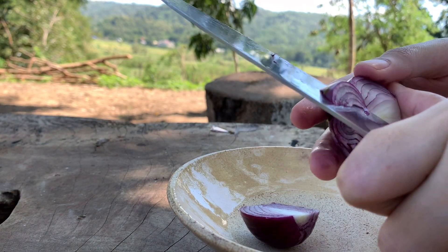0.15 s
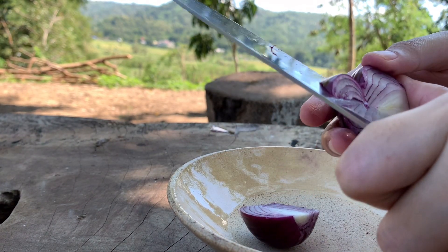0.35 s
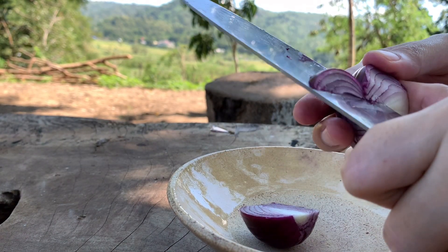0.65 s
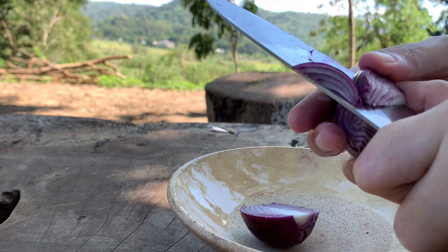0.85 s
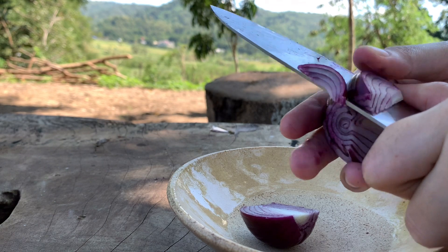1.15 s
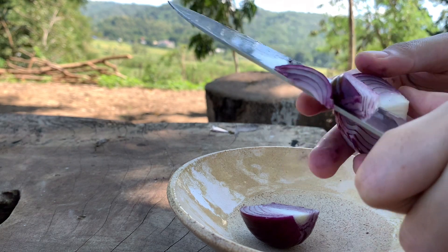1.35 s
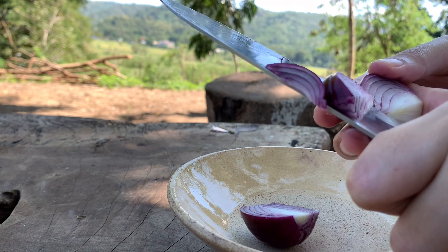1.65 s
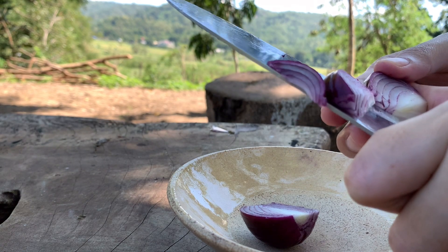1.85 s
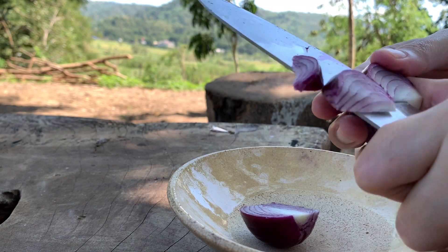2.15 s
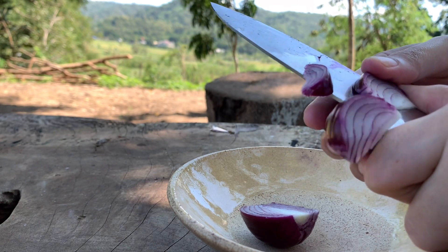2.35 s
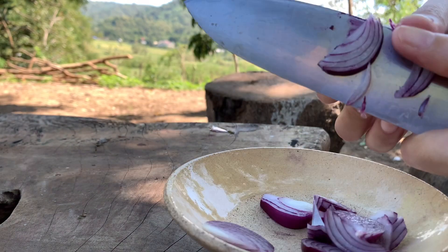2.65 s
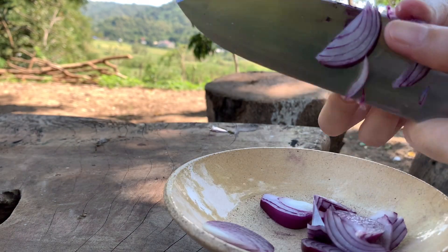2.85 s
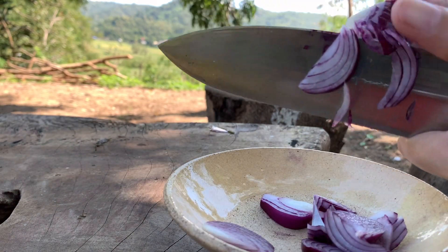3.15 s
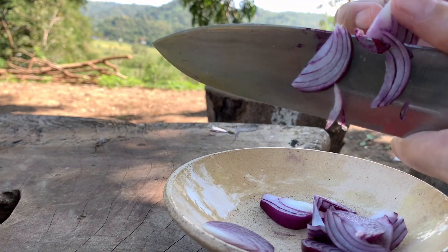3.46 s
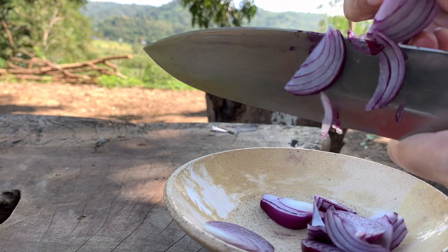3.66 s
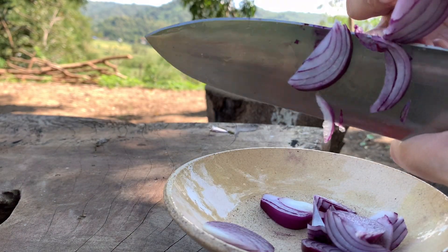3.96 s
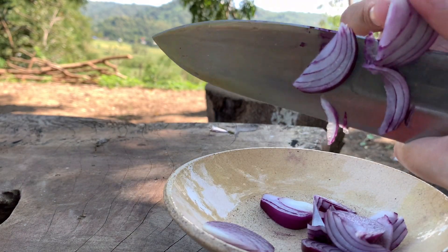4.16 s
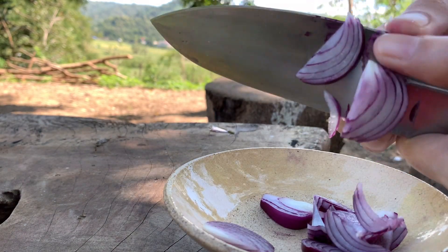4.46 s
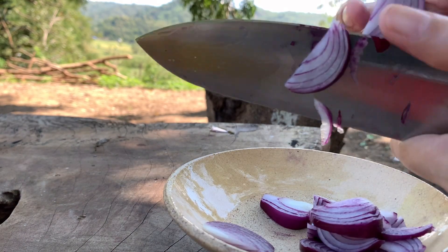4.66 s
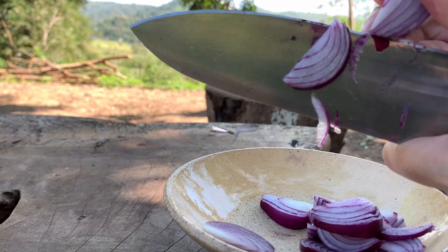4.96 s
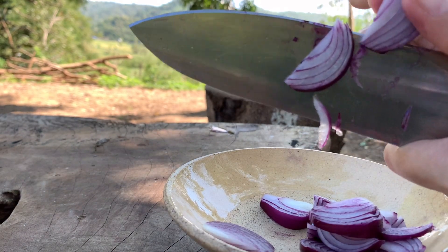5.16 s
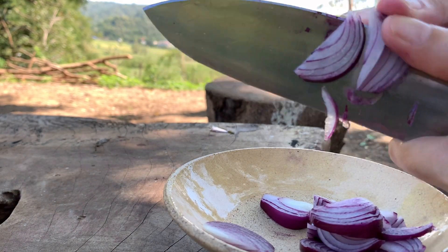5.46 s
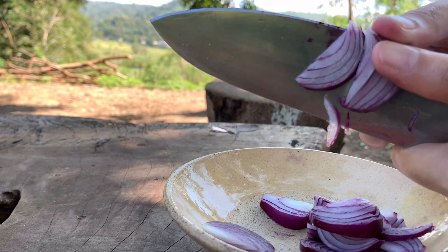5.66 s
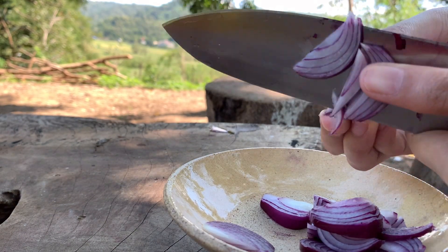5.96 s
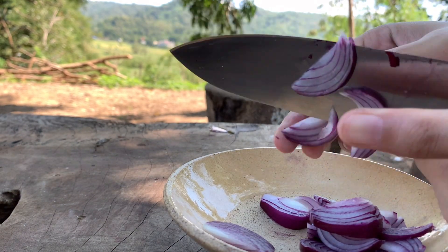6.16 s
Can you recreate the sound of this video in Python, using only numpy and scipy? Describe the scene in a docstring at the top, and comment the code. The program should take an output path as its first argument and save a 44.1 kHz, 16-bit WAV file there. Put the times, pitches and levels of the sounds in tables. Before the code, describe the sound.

Close to the microphone, a knife rasps and crunches through an onion held in the hand, and cut pieces drop with short, dull knocks on a plate. Behind it a distant rooster crows, then a nearer one, then a louder, nearer third, and the far one starts again at the end. Open countryside, with low unsteady rumble, light wind on the microphone and faint hush.

```python
"""At an outdoor table in the country, an onion is sliced in the hand, close by, over a plate.
The blade rasps and crunches through the layers as bursts of cell clicks and wet noise, and pieces
knock on the plate, whose modes ring briefly. Three roosters crow in turn, each nearer than the last,
and the farthest starts again: a buzz of overtones through a throat, with scattered echoes.
Filtered noise makes the low rumble, the breeze on the microphone and the hush under it all."""
import sys
import numpy as np
from scipy import signal
from scipy.fft import rfft, irfft, next_fast_len
from scipy.io import wavfile
from scipy.ndimage import uniform_filter1d

SR = 44100
rng = np.random.default_rng(int(sys.argv[2]) if len(sys.argv) > 2 else 0)


def unload_wav(signal):
    """Save mono or channel-first audio to the path in sys.argv[1] as 16-bit WAV at rate SR, clipped to [-1, 1]."""
    wavfile.write(
        sys.argv[1],
        SR,
        np.round(np.clip(np.atleast_2d(signal).T, -1, 1) * 32767).astype(np.int16),
    )


N = 278006
TIME = np.arange(N) / SR
CUTOFF_HZ = 15900   # top of the finished sound, and of the overtones of a crow


def from_db(db):
    """Decibels to gain."""
    return 10 ** (np.asarray(db) / 20)


def rms_one(x):
    """Scale to unit power."""
    return x / np.sqrt(np.mean(x ** 2) + 1e-20)


def level_at(rows, t=TIME):
    """Read a level curve at the times t."""
    moments, level_db = np.transpose(rows)
    return np.interp(t, moments, level_db)


def at_hz(points, hz):
    """Read a spectrum on a log-frequency axis."""
    f, value = np.transpose(points)
    return np.interp(np.log(hz + 0.0026), np.log(f), value)   # the offset avoids log(0)


def shaped(x, gain_at):
    """Filter by a gain that is a function of frequency."""
    length = x.shape[-1]
    size = next_fast_len(length + 2048)
    hz = np.arange(size // 2 + 1) * SR / size
    return irfft(rfft(x, size) * gain_at(hz), size)[..., :length]


def drift(rate_hz, size=N):
    """Random wander of spread one, fading out above rate_hz."""
    return rms_one(shaped(rng.standard_normal(size), lambda f: 1 / (1 + (f / rate_hz) ** 2)))


def evened(x, span_s):
    """Hold the running level at one."""
    return x / np.sqrt(np.abs(uniform_filter1d(x ** 2, int(span_s * SR))) + 1e-12)


def resonance(x, hz, width_hz):
    """Two-pole resonance with unit gain on top."""
    r = np.exp(-np.pi * width_hz / SR)
    zeros = np.array([1, 0, -1]) * (1 - r * r) / 2
    poles = [1, -2 * r * np.cos(2 * np.pi * hz / SR), r * r]
    return signal.lfilter(zeros, poles, x + 1e-18)


def panned(x, pan_db):
    """Left louder than right by pan_db."""
    return x * from_db(np.array([[.5], [-.5]]) * pan_db)


def bump(t, s, half):
    """A bell of height one around the moment s."""
    return np.exp(-.5 * ((t - s) / half) ** 2)


def held(start, length, attack, release):
    """The samples of an event, its progress from -.5 to .5, and its attack-hold-release envelope."""
    on = (TIME >= start) & (TIME < start + length)
    age = TIME[on] - start
    envelope = np.clip(np.minimum(age / attack, (length - age) / release), 0, 1)
    return on, age / length - .5, envelope


def rumble():
    """A low hum: noise through two equal narrow resonances, its level unsteady."""
    # slow level curve: (time [s], level [dB])
    rumble_levels = [(0, -45), (.45, -53.5), (.9, -44.5), (1.7, -46), (2.2, -51), (3.2, -50.5),
                     (4.2, -45.5), (4.8, -45), (5.7, -51.5), (6.3, -43)]
    hum = rng.standard_normal(N)
    for _ in range(2):
        hum = resonance(hum, hz=61.9, width_hz=18.8)
    throb_db = 0.75 * drift(rate_hz=13)
    return from_db(level_at(rumble_levels) + throb_db) * evened(hum, span_s=0.15)


def breeze():
    """A light breeze on the microphone: low noise that swells in gusts."""
    # gusts added to the steady breeze: (time of the middle [s], half length [s], level [dB])
    gusts = [(3.0, 0.14, -59), (4.052, 0.5, -56), (4.817, 0.11, -51.5)]
    colour = [(8, -1), (25, -30), (44, 20.5), (70, -15), (200, -38.5)]   # (frequency [Hz], level [dB])
    eddies = rms_one(shaped(rng.standard_normal(N), lambda f: from_db(at_hz(colour, f))))
    strength = from_db(-64.5) + sum(from_db(db) * bump(TIME, s, half) for s, half, db in gusts)
    return strength * eddies


def country_air():
    """The hush of open country: stereo noise whose left-right likeness depends on frequency."""
    # relative spectrum of the hush: (frequency [Hz], level [dB])
    air_spectrum = [(47, -38), (80, -5), (98, -6), (125, -9), (160, -16.5), (289, -17), (331, -24.5),
                    (615, -25.5), (937, -36.5), (1120, -32.5), (1560, -37.5), (1700, -40), (2040, -45),
                    (16000, -58.5)]
    # likeness of the two channels: (frequency [Hz], correlation [0-1])
    air_likeness = [(60, 0.41), (140, 1), (250, 0.42), (500, 0.68), (1000, 0), (16000, 0)]
    mid, side = rng.standard_normal((2, N))
    mid = shaped(mid, lambda f: from_db(at_hz(air_spectrum, f)) * np.sqrt(1 + np.clip(at_hz(air_likeness, f), -1, 1)))
    side = shaped(side, lambda f: from_db(at_hz(air_spectrum, f)) * np.sqrt(1 - np.clip(at_hz(air_likeness, f), -1, 1)))
    return from_db(-55) * rms_one(np.array([mid + side, mid - side]))


def background():
    """Rumble and breeze a little to the right, in the wide hush."""
    return panned(rumble() + breeze(), pan_db=-1.6) + country_air()


def outdoors(x, wet_db, t60, far_db, lag_ms, pan_db, dull_hz=3000):
    """Ground and sheds scatter a short dull tail; the trees add a fainter, longer one."""
    t = TIME[:SR]
    fading = from_db(-60 * t / t60) + from_db(far_db - 60 * t / 1.55)
    sparse = rng.random((2, SR)) < .05
    scatter = rng.standard_normal((2, SR)) * sparse * fading * (t > .004)
    scatter /= np.sqrt(np.sum(scatter ** 2, axis=1, keepdims=True))
    echoes = signal.fftconvolve(x[None], scatter, axes=1)[:, :N]
    tail = shaped(echoes, lambda f: 1 / np.hypot(1, f / dull_hz))
    delay_s = lag_ms / 1000 * np.array([[0], [1]])   # right behind left
    direct = shaped(x, lambda f: np.exp(-2j * np.pi * f * delay_s))
    return panned(direct + from_db(wet_db) * tail, pan_db) / np.hypot(1, from_db(wet_db))


def crow(notes, throat, scoop, jitter, flutter, shake_hz, hiss, waver_db=4.5):
    """The syrinx buzzes through the throat; slack at a note's ends, it runs flat, rough and breathy."""
    # moments when the beak works during a note and the balance of the bands shifts: (time of the # middle [s],
    # half length [s], first resonance [dB], second resonance [dB], overtones [dB])
    balance_shifts = [(0.741, 0.02, 5, 10.5, 4), (1.331, 0.021, -9, -9.5, 7),
                      (1.865, 0.034, -2.5, -14, 13.5), (1.976, 0.033, 3, 7.5, -2), (2.14, 0.019, -2, 5, 10),
                      (3.6, 0.019, 4.5, -9, 0.5), (3.742, 0.018, -12, 4.5, 1.5), (3.791, 0.011, 9, -5, -6),
                      (5.097, .03, -19, -4.5, 8.5), (5.54, 0.026, -21, -6, 19.5),
                      (5.638, 0.0089, 3, -22, 7), (5.685, .03, 3.5, 10, -4)]
    out = np.zeros(N)
    for (start, length, hz, glide, arch, scoop_s, drop_s, db, swell_db,
         bright_db, brighten_db, shrill_db, held_rough) in notes:
        on, progress, envelope = held(start, length, attack=0.33 * scoop_s, release=.02)
        t = TIME[on]
        scooping = np.clip(1 - (t - start) / scoop_s, 0, 1)
        dropping = np.clip(1 - (start + length - t) / drop_s, 0, 1)
        slack = np.maximum(scooping, dropping)
        pitch = (hz + glide * progress - arch * (2 * progress) ** 2) * (1 - scoop * slack ** 2)
        slack_rough = np.maximum(0.781 * scooping * (2 - scooping), 0.71 * dropping)
        rough = np.clip(slack_rough, held_rough, 1)

        # slackness lifts the lowest band and dulls the overtones
        shift_first, shift_second, shift_top = sum(np.outer(shifts, bump(t, s, half))
                                                   for s, half, *shifts in balance_shifts)
        level_db = db + swell_db * progress
        first_gain = from_db(level_db + 2 * slack + shift_first)
        second_gain = from_db(level_db + bright_db + brighten_db * progress + shift_second)
        top_gain = from_db(shrill_db - 7 * slack + shift_top)

        # uneven cycles
        uneven_pitch = pitch * (1 + jitter * rough * drift(shake_hz, size=len(t)))
        phase = 2 * np.pi * np.cumsum(uneven_pitch) / SR
        buzz = np.zeros(len(t))
        for k in range(1, 23):
            # from the third harmonic up, each wavers by itself as the head moves
            waver = from_db(waver_db * (k > 2) * drift(22, size=len(t)))
            buzz += np.cos(k * phase + k * k) * (k * pitch < CUTOFF_HZ) * waver
        buzz = rms_one(buzz) * (1 + flutter * rough * drift(shake_hz, size=len(t)))
        # air noise pulses with the cycles
        air = hiss * rough ** 3 * rng.standard_normal(len(t)) * (1 + np.cos(phase))

        voice = shaped(buzz + air, lambda f: from_db(at_hz(throat, f)) / np.hypot(1, (450 / (f + 1)) ** 4))
        first = shaped(voice, lambda f: 1 / (1 + (f / 1300) ** 12))
        top = shaped(voice, lambda f: 1 - 1 / (1 + (f / 2400) ** 16))
        second = voice - first - top
        body = first_gain * evened(first, 0.093) + second_gain * evened(second, 0.083)
        # the overtones grow with the effort of the call
        effort = np.hypot(first_gain, second_gain)
        out[on] += envelope * (body + effort * top_gain * top / np.std(voice - top))
    return out


def roosters():
    """Three birds; the farther the bird, the more of its call is scattered sound."""
    # throat colour of each bird: (frequency [Hz], level [dB])
    far_throat = [(450, -71), (750, 7), (950, 9.5), (1300, -5.5), (1850, 4), (2350, -9.5), (2800, -13.5),
                  (3150, 0), (3550, -19), (4700, -16), (5300, -12.5), (7000, -8), (9000, -21), (10800, -16),
                  (13000, -31), (16000, -29)]
    middle_throat = [(450, -17), (700, 3), (880, 1), (1250, -7.5), (1780, 4), (2300, -5.5), (2700, -21),
                     (2900, -3.5), (3280, -13.5), (3550, -28), (3950, -21), (4400, -4.5), (5200, -20.5),
                     (6500, -8), (7600, -29), (10300, -15.5), (12500, -49.5), (16000, -31)]
    near_throat = [(450, -27), (730, 10), (950, 3), (1190, 9.5), (1450, -8.5), (1750, -1.5), (2120, -2.5),
                   (2480, -30.5), (2850, -3.5), (3250, -20.5), (3750, -11), (4750, -7.5), (6800, -23.5),
                   (8400, -13.5), (10400, -14.5), (16000, -41)]
    # notes of each bird, before scoop, drop and balance shifts; glide and swells run from start to
    # end, and the arch is how far both ends lie below the middle: (start [s], length [s], pitch [Hz],
    # glide [Hz], arch [Hz], scoop time [s], drop time [s], level [dB], swell [dB],
    # second resonance [dB], its swell [dB], overtones [dB], least roughness [0-1])
    far_notes = [ (0.62, 0.22, 887, -2, 11.5, .03, 0.02, -64, -15, 8, 7, -3.5, 0.86),
                 (0.92, 0.13, 1024, -5, 20, 0.058, 0.061, -57.5, 1, 7, -12, 0.5, 0.71),
                 (1.08, 0.39, 964, 16, 12.7, .09, 0.066, -55.5, -0.5, 5, 3, 5, 0.82),
                 (1.62, 0.82, 862.7, -79, 33, .11, 0.051, -59, 0, 1, -21, 1.5, 0.11),
                 (6.18, 0.167, 871, -1, 15.5, .08, .03, -60.5, 4, 8.5, -1.5, 5, 0.93), ]
    middle_notes = [ (2.652, 0.1, 891.4, -14, -5, 0.006, .02, -48.5, -16.5, 1, 1, -1.2, 0.68),
                    (2.79, 0.43, 901.8, -9, 105, .13, 0.071, -43.5, -1, 1.5, -2.5, -2, 0.305),
                    (3.2, 0.25, 718.9, -2, 0.5, .13, 0.0046, -54, 1.5, 1.5, 9, -0.61, .12),
                    (3.445, 0.38, 819.5, -15, 6, 0.036, 0.084, -50, -4.5, -3, 0, 1, 0.015), ]
    near_notes = [ (4.455, 0.175, 847, 21, 3.5, .07, 0.011, -49, -19.5, 5, 24, -0.5, 0.93),
                  (4.712, 0.11, 975, -29, -1, 0.046, 0.053, -39.5, 9, 1.5, -6, -3.5, 0.13),
                  (4.885, 0.35, 970.5, -62, 9.5, .1, .095, -38.5, 1, 0.5, 1, -3.5, 0.056),
                  (5.35, 0.46, 913.2, -137, 13.5, 0.067, 0.036, -40.5, 4.5, -2, -8, -1, 0.017), ]
    far = crow(far_notes, far_throat, scoop=.09, jitter=0.0269, flutter=0.76, shake_hz=64, hiss=0.92)
    middle = crow(middle_notes, middle_throat, scoop=.08, jitter=0.0464, flutter=1.0, shake_hz=52.6, hiss=1.0)
    near = crow(near_notes, near_throat, scoop=0.22, jitter=0.0363, flutter=0.4, shake_hz=124, hiss=1.0)
    return (from_db(2.5) * outdoors(far, wet_db=11, t60=0.3, far_db=-21, lag_ms=0.2, pan_db=1.3)
            + from_db(0.5) * outdoors(middle, wet_db=4, t60=0.31, far_db=-21.0, lag_ms=-0.098, pan_db=0.0)
            + from_db(1.0) * outdoors(near, wet_db=1, t60=0.28, far_db=-30.5, lag_ms=-0.1, pan_db=1.0))


def plate():
    """A soft piece gives the plate a brief push, and the table damps the ring."""
    # pieces landing: (time [s], strength of the push [dB], contact decay time [s])
    drops = [(1.117, -45.5, 0.00062), (2.4874, -37, 0.00018), (2.4915, -75, 0.00045),
             (2.6073, -40.5, 0.000045), (2.619, -69, 0.0012), (4.573, -48.5, 0.00013),
             (4.645, -52.5, 0.00048), (6.2497, -28, 0.0022)]
    # modes of the plate on the wooden table: (frequency [Hz], level [dB], t60 [s])
    plate_modes = [(313, -8.5, 0.34), (384, -4, 0.13), (425, -5, 0.11), (504, -1, 0.11), (572, 0, 0.066),
                   (876, -2, 0.11), (1220, -1.5, 0.014), (1670, -13.5, 0.05), (2070, -17, 0.028)]
    pushes = np.zeros(N)
    for s, db, contact in drops:
        after = (TIME >= s) & (TIME < s + .02)
        pushes[after] += from_db(db) * np.exp(-(TIME[after] - s) / contact) / (contact * SR)
    t = TIME[:SR // 4]
    ring = sum(from_db(db - 60 * t / t60) * np.sin(2 * np.pi * hz * t) for hz, db, t60 in plate_modes)
    knocks = signal.fftconvolve(pushes, ring)[:N]
    # so small a plate radiates little bass
    bass_cut = signal.butter(2, 260, "high", fs=SR, output="sos")
    return panned(signal.sosfilt(bass_cut, knocks), pan_db=5.0)


def cells(per_s, spread_db, fizz):
    """Onion cells burst as tiny clicks over a wet fizz, a little different at each ear."""
    born = rng.random(N) < per_s / SR
    sizes = from_db(spread_db * np.minimum(rng.exponential(1, N), 4))
    clicks = rms_one(born * sizes * rng.standard_normal((2, N)))
    return clicks + fizz * rng.standard_normal((2, N))


def slicing(slice_db=-5.5, catch_db=2.5, attack_s=.03, t60_s=0.13, thin_hz=2360):
    """The blade slides through the flesh and cells burst in a thin rasp; the edge catches and slips."""
    # strokes, before slice_db: (start [s], length [s], level [dB], swell from start to end [dB])
    strokes = [(0.467, 0.37, -53.5, 2), (0.871, 0.13, -55.5, 12.5), (1.707, 0.4, -71.5, -7),
               (1.9, 0.64, -55, -1), (2.627, 0.12, -56, -6), (2.79, 0.12, -59, -17), (4.073, 0.24, -50, 5),
               (4.351, 0.047, -54.5, -6.5), (4.984, 0.41, -60, -2), (5.31, 0.17, -52.5, 23),
               (5.502, 0.353, -56, -17)]
    strength = np.zeros(N)
    for start, length, db, swell_db in strokes:
        on = (TIME >= start) & (TIME < start + length + t60_s)
        age = TIME[on] - start
        swell = swell_db * (np.minimum(age / length, 1) - .5)
        fade = 60 * np.maximum(age - length, 0) / t60_s
        stroke = np.minimum(age / attack_s, 1) * from_db(db + swell - fade + slice_db)
        strength[on] = np.hypot(strength[on], stroke)
    strength = strength * from_db(catch_db * drift(30))
    rasp = strength * rms_one(cells(per_s=1400, spread_db=1.0, fizz=0.86))
    return shaped(rasp, lambda f: f / np.hypot(f, thin_hz))


def crunching(crunch_db=-1.0, skew=0.19):
    """A whole layer gives way in a burst of cells and sets the blade ringing; returns both sounds."""
    # layers, before crunch_db: (time of the middle [s], level [dB], half length [s],
    # ring of the blade against the burst [dB])
    crunches = [(0.499, -54, 0.0043, 1), (0.528, -50, 0.011, -34), (0.633, -44, 0.011, -5),
                (0.697, -46.5, 0.022, -4), (0.804, -45, 0.012, -3), (0.968, -56, 0.0068, 6),
                (1.006, -48, 0.0041, -3), (1.821, -58.5, 0.0055, -4), (2.063, -49.5, 0.0057, -29),
                (2.119, -49.5, 0.011, -2), (2.202, -46.5, 0.027, -6), (2.68, -51, 0.0065, -19),
                (4.011, -46.5, 0.0038, -29), (4.057, -52.5, 0.012, -23), (4.279, -39, 0.0086, -6),
                (4.303, -41, 0.0094, 6.5), (4.378, -48, 0.0021, 6), (5.181, -44, 0.0048, -4),
                (5.332, -43.5, 0.0097, -30), (5.458, -44.5, 0.015, 9)]
    splitting, ringing = np.zeros((2, N))
    for s, db, half, ring_db in crunches:
        near = np.abs(TIME - s) < 4 * half
        t = TIME[near]
        # a layer splits faster than it settles
        crest = s - skew * half
        burst = from_db(db + crunch_db) * bump(t, crest, half * (1 + skew * np.sign(t - crest)))
        splitting[near] += burst
        ringing[near] += burst * from_db(ring_db)
    grain = rms_one(cells(per_s=8000, spread_db=0.0, fizz=0.77))
    blade = ringing * rms_one(resonance(grain, hz=10200, width_hz=1000))
    return splitting * grain, blade


def snapping(snap_db=-14.0, t60_s=0.01):
    """Single fibres snap in abrupt, quickly dying bursts of noise."""
    # snaps, before snap_db: (time [s], level [dB])
    snaps = [(0.6385, -40), (1.0018, -26), (2.105, -43), (2.489, -23.5), (2.608, -34), (2.6307, -34),
             (2.7425, -34), (2.8894, -30), (4.2694, -20.5), (5.3078, -35), (5.379, -29.5), (5.4448, -27),
             (5.8676, -36), (6.2506, -31)]
    strength = np.zeros(N)
    for s, db in snaps:
        after = (TIME >= s) & (TIME < s + .04)
        strength[after] += from_db(db + snap_db - 60 * (TIME[after] - s) / t60_s)
    return strength * rng.standard_normal((2, N))


def knife():
    """Slicing, crunches and snaps share the colour of the flesh; the ring of the blade joins them."""
    # colour of the flesh: (frequency [Hz], level [dB])
    flesh_colour = [(300, -27), (1000, -8.5), (2000, -8), (3400, -1), (5000, -5.5), (7000, -0.5), (9000, 0),
                    (10700, 3), (12500, -0.5), (15000, 9), (16500, -16)]
    crunch, blade = crunching()
    cracks = slicing() + crunch + snapping()
    flesh = from_db(7.5) * shaped(cracks, lambda f: from_db(at_hz(flesh_colour, f)))
    return panned(flesh + blade, pan_db=-0.94)


def scene():
    """Roosters and rumble beyond, plate and knife in front."""
    return background() + roosters() + plate() + knife()


def record(dry):
    """In the treble both channels carry nearly the same sound, the left a little later; the top is cut."""
    left, right = dry
    own_share = 0.17   # part of the treble, in amplitude, that stays the left channel's own
    lag_s, shared_hz = 0.1788e-3, 5730

    def common(f):
        """Share of the power, rising around shared_hz, that both channels share."""
        return (1 - own_share ** 2) / (1 + (shared_hz / (f + 1)) ** 8)

    own = shaped(left, lambda f: np.sqrt(1 - common(f)))
    shared = shaped(right, lambda f: np.exp(-2j * np.pi * f * lag_s) * np.sqrt(common(f)))
    return shaped(np.array([own + shared, right]), lambda f: 1 / np.hypot(1, (f / CUTOFF_HZ) ** 120))


dry = scene()
out = record(dry)
unload_wav(out)
```